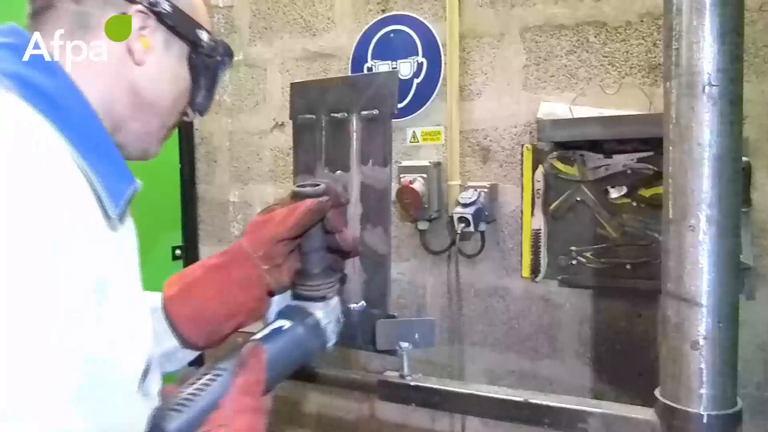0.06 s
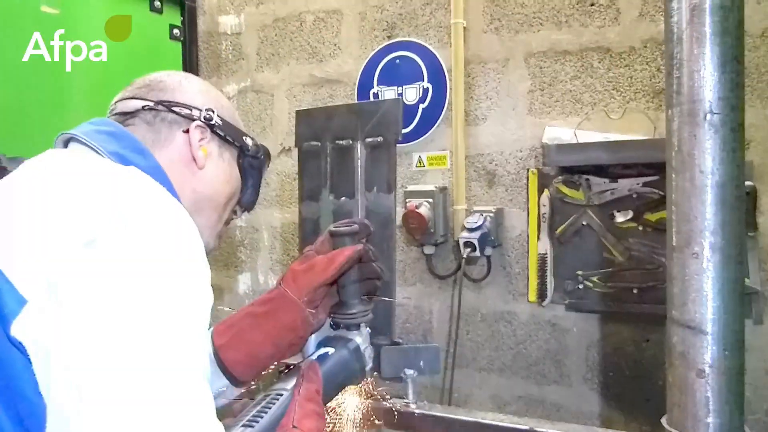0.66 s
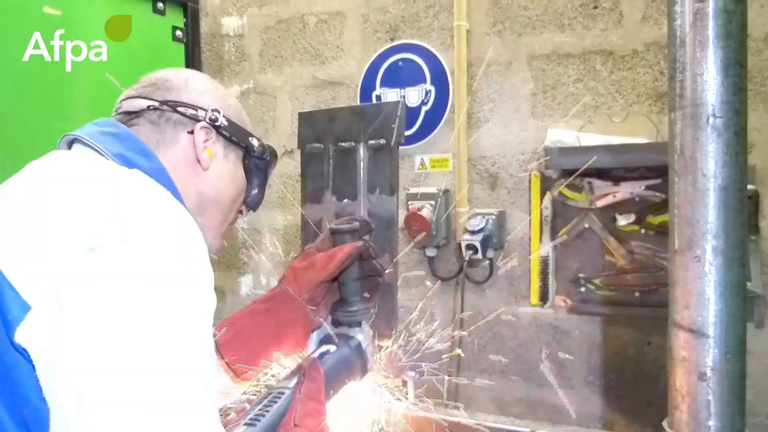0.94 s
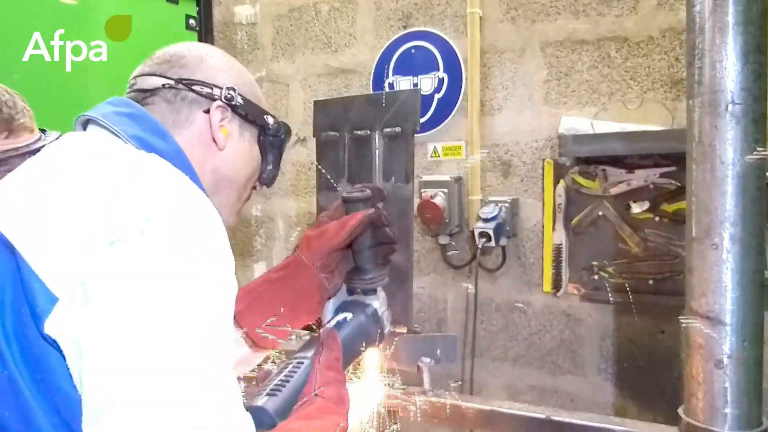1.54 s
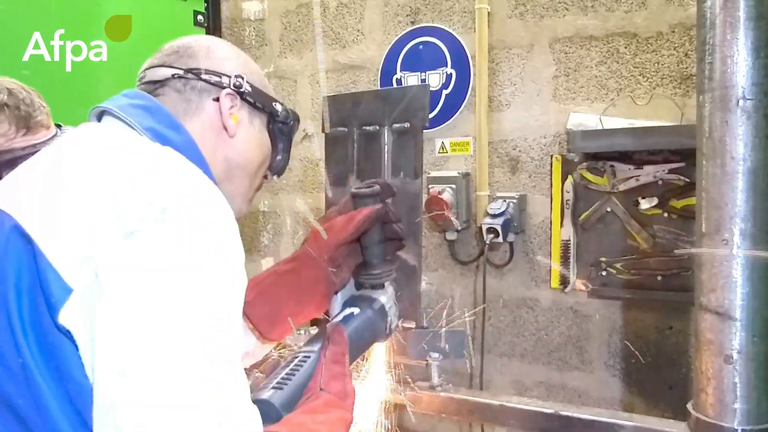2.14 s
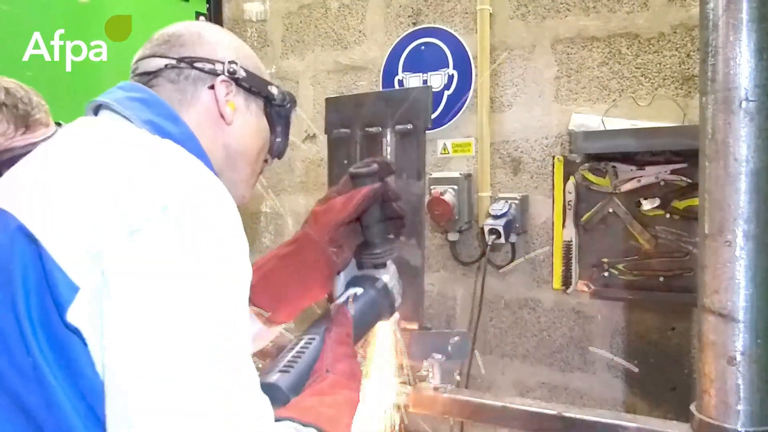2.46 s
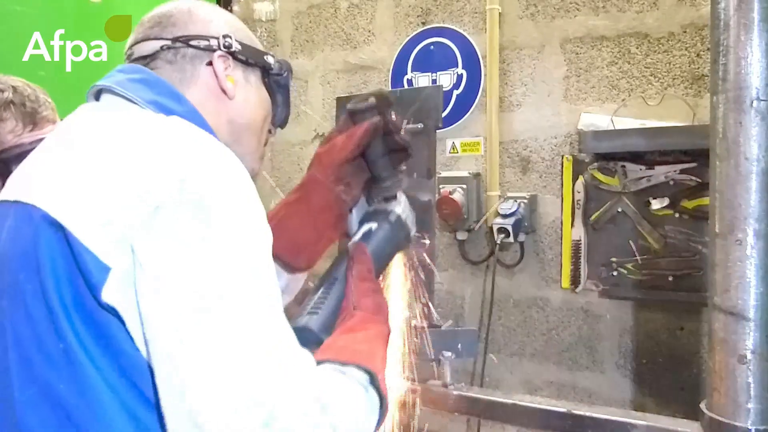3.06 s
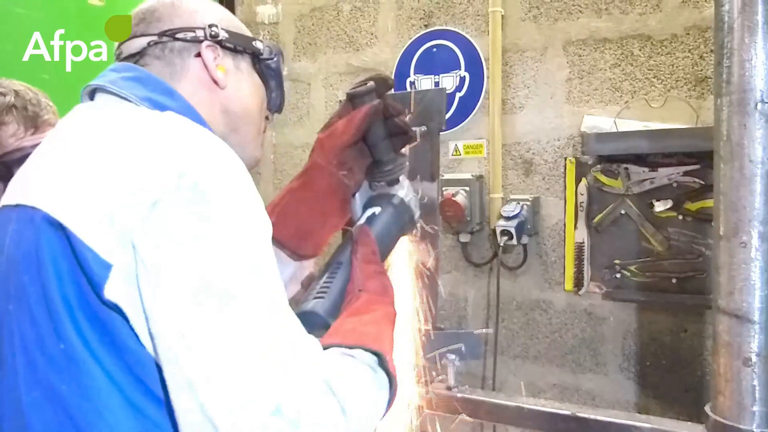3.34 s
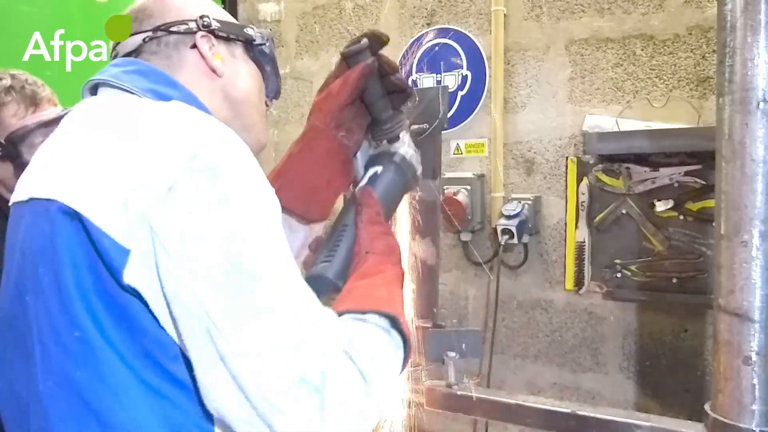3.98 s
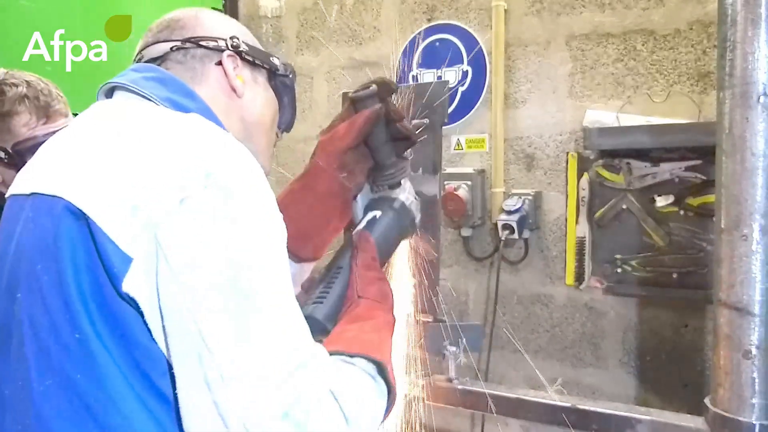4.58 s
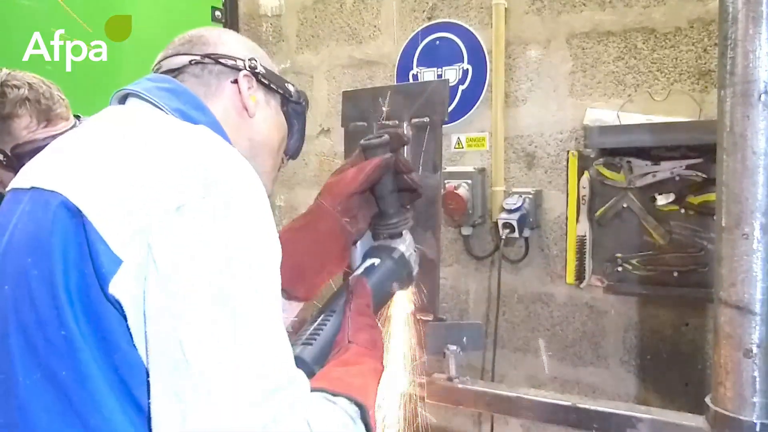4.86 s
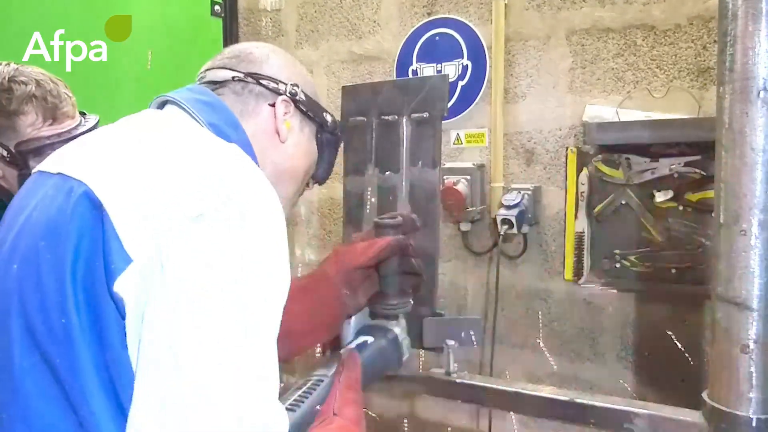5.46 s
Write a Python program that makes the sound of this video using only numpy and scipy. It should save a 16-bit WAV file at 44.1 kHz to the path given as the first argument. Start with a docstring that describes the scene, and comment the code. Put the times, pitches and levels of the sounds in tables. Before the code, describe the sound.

An angle grinder spins freely for an instant, then its disc hits a thick steel plate with a sharp crack and a rising zing. A loud, bright, gritty hiss follows as the motor slows under load. The disc chatters in its groove, with many short high squeals and a few rasping scrapes, easing slightly at the end. It is heard nearby, a little to the right, in a workshop.

```python
"""In a workshop, an angle grinder runs free, touches a thick steel plate and is drawn along it.
Its fan rushes over a faint room rumble. The disc lands with a crack and a zing, then its grains hiss.
Under load the motor slows and the disc chatters once per turn. The chatter is made of orders (whole
multiples of the motor speed), and one squeals when it meets a resonance, a pitch at which disc or plate
likes to ring. Now and then the disc scrapes in its groove."""
import sys
import numpy as np
from scipy import signal
from scipy.fft import rfft, irfft, next_fast_len
from scipy.io import wavfile
from scipy.ndimage import uniform_filter1d

SR = 44100
rng = np.random.default_rng(int(sys.argv[2]) if len(sys.argv) > 2 else 0)


def log_audio(samples):
    """Write samples as a 16-bit WAV file to the path given in sys.argv[1]."""
    # one column per channel
    frames = np.atleast_2d(samples).T
    # limit to full scale, then quantise
    limited = np.clip(frames, -1, 1)
    pcm = np.round(limited * 32767).astype(np.int16)
    wavfile.write(sys.argv[1], SR, pcm)


N = 247401
TIME = np.arange(N) / SR
FREQS_HZ = np.fft.rfftfreq(next_fast_len(N), 1 / SR) + 1

# wall reflections compared with the direct sound: pitch_hz, level_db
REFLECTIONS = [(60, -5), (150, -4), (330, -7), (500, -17), (800, -2), (1300, 0.5), (2400, -5), (4400, -1.5),
               (6400, -9.5), (8500, -20.5), (15000, -23.5)]
# balance between the ears: pitch_hz, left_minus_right_db
BALANCE = [(300, 0), (800, -0.5), (2400, -2.5), (4400, -3.8), (8000, -1), (15000, -0.5)]
# colour (how strong each pitch is) of the still room air: pitch_hz, level_db
AIR_COLOUR = [(12, -31), (20, -2.5), (139, -1.5), (176, 0), (274, -2.5), (300, 0), (390, -23), (660, -120)]
# soft handling bumps: start_s, level_db
BUMPS = [(.093, -48), (0.254, -38.5)]
# turns of the motor per second: time_s, speed_hz
MOTOR_SPEED = [(0.17, 564), (0.41, 565), (0.65, 536), (1.01, 454), (1.18, 418.0), (1.31, 420),
               (1.41, 413.7), (1.51, 406), (1.61, 400.4), (1.71, 400), (1.81, 397.3), (1.87, 394.7),
               (1.96, 389.2), (2.02, 384.7), (2.15, 380.6), (2.29, 389), (2.46, 381.3), (2.59, 384.3),
               (2.7, 381.2), (2.81, 385.8), (2.96, 377.6), (3.12, 374.5), (3.2, 384.3), (3.28, 382.6),
               (3.4, 378), (3.49, 373), (3.64, 380.3), (3.8, 380.8), (3.9, 384.2), (3.98, 382),
               (4.07, 374.4), (4.2, 381.2), (4.32, 389), (4.41, 375.7), (4.53, 372.6), (4.76, 374.2),
               (4.87, 372.6), (5.04, 378.8), (5.11, 377), (5.26, 379), (5.35, 373.7), (5.44, 363),
               (5.59, 409)]
# motor and fan noise: pitch_hz, level_db
FAN_COLOUR = [(30, -44), (200, -21), (290, -11), (420, -7.5), (620, -1.5), (950, -7), (1400, -5),
              (1900, -9.5), (4300, -6), (6500, -6.5), (9000, -14), (13000, -10.5), (16000, -11)]
# resonances of the motor housing: pitch_hz, width_hz, free_boost_db, loaded_boost_db
HOUSING_RINGS = [(419, 42, 9.1, 2.6), (481, 34, 15.5, 10.7), (563, 9.7, 4.9, 2.9), (771, 51, 13.5, 10.2)]
# the crack of disc on steel: pitch_hz, level_db
CRACK_COLOUR = [(120, -45), (350, -28), (900, -15), (1800, 6), (4500, 4), (6400, 7.5), (9000, 7.5),
                (16000, -1)]
# resonances of the struck disc: pitch_hz, width_hz, boost_db
CRACK_RINGS = [(4400, 250, 5), (5980, 200, 17.5), (6500, 180, 7)]
# loudness of the cut, following the pressure of the hand: time_s, level_db
HAND_PRESSURE = [(0.21, -24), (0.25, -20.5), (0.61, -19), (1.17, -22), (1.25, -19), (1.75, -22),
                 (1.91, -19), (2.07, -20.5), (2.97, -21), (3.01, -23.5), (3.53, -20), (4.25, -22.5),
                 (4.37, -21.5), (4.91, -21.5), (4.95, -23.5), (5.09, -22.5), (5.17, -25.5), (5.43, -22),
                 (5.49, -26.5), (5.59, -22)]
# the disc skimming the surface: pitch_hz, level_db
SKIM_COLOUR = [(500, -41), (1200, -26), (1700, -17.5), (2150, -6.5), (3500, -5.5), (4250, -0.5),
               (4800, -1.5), (6500, 4.5), (7700, 1), (9500, 1), (10800, -4.5), (12300, 7.5), (13200, 0),
               (14900, 8), (15900, 6)]
# the disc running in its groove: pitch_hz, level_db
GROOVE_COLOUR = [(500, -41.5), (1000, -34), (1500, -27), (2100, -10), (3500, -8.5), (4300, -1), (5300, -5),
                 (6450, 8), (7900, -7.5), (8900, 1), (11300, -1.5), (12400, 14), (15000, 15), (15900, 3.5)]
# resonances of disc and plate: pitch_hz, width_hz, skim_boost_db, groove_boost_db
CUT_RINGS = [(1684, 27, 5, 11), (2153, 27, 6.5, 2.5), (3064, 12, 16, 6), (3247, 63, 8.5, 10),
             (4240, 150, 6, 1), (3820, 40, -1, 3), (4520, 160, -9, 3), (4570, 56, 14, 6),
             (8600, 190, -3.5, 7)]
# the cut's low (plate), middle and high (grit) bands:
# offset_db, db_per_hz of extra motor speed, skid_loss_db, pressure_share, lift_loss_db
CUT_BANDS = [(-12, 0.0287, 0, 0.93, 0.5), (-6.5, 0.0228, 8, 0.81, 2), (-2.5, 0.0376, 0, 0.35, 7)]
BAND_EDGES_HZ = [5300, 11500]
# the chatter is sharper than the hiss: pitch_hz, boost_db
CHATTER_TILT = [(2200, -5.5), (3300, -4), (4200, -3), (4600, -5.5), (5500, -5), (7000, -4.5), (8700, -0.5),
                (9700, 2), (11200, 3.5), (13000, 1.5)]
# the disc judders hard in its groove: middle_s, length_s
JUDDERS = [(1.66, 0.68), (2.12, 0.14), (2.33, 0.12), (2.58, 0.13), (3.04, 0.17), (3.25, 0.21),
           (3.83, 0.069), (4.1, 0.35), (4.98, 0.076), (5.19, 0.21)]
# squeals: start_s, end_s, order, level_db, neighbour_share, left_minus_right_db
SQUEALS = [(0.82, 0.95, 6, -36, 0.1, -3), (0.95, 1.002, 7, -33.5, 0.1, -4), (1.037, 1.11, 9, -34, 0.2, -6),
           (1.064, 1.14, 7, -39.0, 0, 2), (1.184, 1.427, 11, -34.5, 0, -7), (1.192, 1.365, 7, -34.5, 0, -3),
           (1.243, 1.424, 21, -40, 0.5, -1), (1.4, 1.563, 7, -40, 0, 1.5), (1.53, 1.586, 22, -29, 0.1, 0),
           (1.541, 1.63, 8, -38.5, 0, 1), (1.564, 1.698, 9, -37.0, 0.1, -2), (1.571, 1.812, 7, -36, 0, -2),
           (1.575, 1.718, 33, -33, 0.3, -7), (1.613, 1.86, 11, -39.5, 0.1, -9),
           (1.62, 1.723, 10, -45, 0, -10), (1.85, 2.012, 3, -55, 0, -4), (1.98, 2.06, 16, -33, 0.3, -6),
           (2.05, 2.317, 8, -45.5, 0, 6), (2.057, 2.2, 23, -41, 0.1, 10), (2.099, 2.997, 3, -69.0, 0, -2),
           (2.15, 2.2, 32, -28, 0.2, 1), (2.335, 2.865, 5, -44.5, 0, -3), (2.37, 2.49, 38, -27.5, 0.3, -6),
           (2.45, 2.741, 8, -45, 0, 11), (2.473, 2.552, 17, -33, 0.5, -2), (2.715, 2.823, 10, -38, 0.1, -5),
           (2.744, 2.779, 23, -27.5, 0.1, 2), (2.899, 2.967, 8, -36, 0, -2),
           (2.985, 3.12, 16, -35.5, 0.2, 0), (2.991, 3.12, 23, -30.5, 0.2, -2),
           (3.004, 3.06, 33, -29, 0.5, 5), (3.07, 3.176, 13, -34, 0, 5), (3.15, 3.33, 3, -68.5, 0, -1),
           (3.202, 3.268, 23, -25, 0.1, -1), (3.286, 3.51, 10, -38, 0, -19), (3.432, 3.508, 13, -33, 0, 10),
           (3.484, 3.544, 20, -32.0, 0.1, -2), (3.514, 3.622, 10, -29.5, 0, -10),
           (3.536, 3.623, 17, -31, 0.5, -1), (3.543, 3.774, 23, -39, 0.1, -10),
           (3.718, 3.818, 9, -36, 0, -4), (3.78, 3.883, 38, -33, 0.6, -9), (3.903, 3.986, 9, -36, 0, -6),
           (3.9, 4.004, 10, -38.5, 0, -11), (3.943, 4.164, 23, -37, 0.1, -6),
           (4.022, 4.101, 20, -35, 0.1, -3), (4.064, 4.132, 17, -32.5, 0.9, -6),
           (4.097, 4.148, 37, -26, 0.3, -3), (4.358, 4.472, 23, -40, 0.2, -6),
           (4.38, 4.469, 10, -36, 0, -8), (4.539, 4.684, 23, -40, 0.3, -4), (4.698, 4.806, 13, -32.0, 0, 7),
           (4.779, 4.941, 3, -62, 0, 1), (4.888, 5.28, 29, -38, 0.1, -7), (4.959, 5.052, 33, -36, 0.3, 4),
           (5.059, 5.3, 23, -36.5, 0.1, 6.5), (5.068, 5.137, 25, -38, 0.7, -5),
           (5.06, 5.173, 17, -36, 1, -6), (5.119, 5.197, 35, -30, 0.2, -7), (5.19, 5.331, 10, -37.5, 0, -7),
           (5.203, 5.31, 16, -35, 0.1, -12), (5.193, 5.323, 12, -37.5, 0, -4), (5.214, 5.41, 8, -40, 0, -2),
           (5.222, 5.298, 33, -31, 0.35, 3), (5.233, 5.286, 35, -28, 0.3, -8),
           (5.326, 5.43, 18, -31, 0.15, -4), (5.38, 5.45, 19, -35, 0.1, -15)]
# the face of the disc scrapes the groove wall: start_s, end_s, level_db
SCRAPES = [(0.832, 0.877, -23), (1.88, 2.05, -38), (2.813, 2.9, -34), (3.831, 3.948, -32), (4, 4.063, -28),
           (4.321, 4.588, -26.5), (4.599, 4.717, -30.5), (5.367, 5.459, -34)]
# colour of a scrape: pitch_hz, level_db
SCRAPE_COLOUR = [(800, -45), (2500, -23), (4000, -2.5), (5400, -9), (7000, 5), (7900, -9), (9200, 1),
                 (15000, 0.5)]
# broad resonances of the scraped steel: pitch_hz, width_hz, boost_db
SCRAPE_RINGS = [(4150, 310, 13), (4430, 250, 7.2), (6250, 370, 7.7), (6660, 300, 6.7)]

TOUCH_S, CHATTER_FADE_S, LIFT_S = 0.1722, 5.26, 5.43   # disc lands, chatter starts to fade, disc lifts
SINK_START_S, SINK_END_S = 0.51, 3   # the disc sinks into its groove
LOADED_HZ, CUTOFF_HZ = 380, 15850   # usual motor speed in the groove; top of the treble


def from_db(db):
    """Turn decibels into a gain to multiply by."""
    return 10 ** (np.asarray(db) / 20)


def rms(x):
    """Average strength of a signal (root mean square)."""
    return np.sqrt(np.mean(x ** 2) + 1e-20)


def in_time(rows):
    """Join (time, value) points into one value per sample."""
    return np.interp(TIME, *np.transpose(rows))


def response(colour, rings=()):
    """Gain at each pitch: a broad colour with resonances on top."""
    hz, db = np.transpose(colour)
    boosts = sum(boost / (1 + (2 * (FREQS_HZ - centre) / width) ** 2) for centre, width, boost in rings)
    return from_db(np.interp(np.log(FREQS_HZ), np.log(hz), db) + boosts)


def filtered(x, gain):
    """Apply a gain at each pitch."""
    size = next_fast_len(N)
    return irfft(rfft(x, size) * gain, size)[..., :N]


def drift(rate_hz, size=N):
    """A smooth random wobble, about 1 in size, drawn every 40 samples."""
    pole = np.exp(-80 * np.pi * rate_hz / SR)
    slow = signal.lfilter([1], [1, -2 * pole, pole * pole], rng.standard_normal(N // 40 + 2002))[2000:]
    return np.interp(np.arange(size) / 40, np.arange(len(slow)), slow / rms(slow))


def fade(start_s, end_s, share=0.28):
    """Swell and die away, each over a share of the length; half strength at start and end."""
    inside_s = np.minimum(TIME - start_s, end_s - TIME)
    return np.clip(inside_s / (share * (end_s - start_s)) + .5, 0, 1)


def in_room(pair, gain, walls_db=0):
    """The first signal arrives directly, the second as reflections that differ between the ears."""
    direct = filtered(pair[0], gain)
    reflected = filtered(pair[1], gain * response(REFLECTIONS)) * from_db(walls_db)
    return np.array([direct + reflected, direct - reflected])


def background(air_db=-78, bump_hz=125, bump_decay_s=0.02):
    """Faint room rumble and dull handling bumps."""
    air = in_room(rng.standard_normal((2, N)), response(AIR_COLOUR))
    out = air / rms(air) * from_db(air_db)
    for start_s, db in BUMPS:
        age = np.maximum(TIME - start_s, 0)
        out += from_db(db - 60 * age / bump_decay_s) * np.sin(2 * np.pi * bump_hz * age)
    return out


def fan(speed, free_db=-40, loaded_db=-71, db_per_hz=0.06):
    """The fan's rush is turned down sharply when the loud cut begins, then sinks further in step with the motor
    speed."""
    def rush(rings, walls_db):
        air = in_room(rng.standard_normal((2, N)), response(FAN_COLOUR, rings), walls_db)
        hollow = filtered(air.mean(0), (FREQS_HZ > 300) & (FREQS_HZ < 900))
        return air / rms(hollow)   # the hollow-sounding band sets the level
    free = rush([(hz, width, boost) for hz, width, boost, _ in HOUSING_RINGS], walls_db=-7)
    loaded = rush([(hz, width, boost) for hz, width, _, boost in HOUSING_RINGS], walls_db=0)
    loaded *= from_db(loaded_db + db_per_hz * (speed - LOADED_HZ))
    turned_down = np.clip((TIME - TOUCH_S) / 0.018, 0, 1)
    return (1 - turned_down) * from_db(free_db) * free + turned_down * loaded


def crack(level_db=-12, decay_s=0.1):
    """The disc strikes the steel and rings briefly."""
    age = np.maximum(TIME - TOUCH_S, 0)
    ring = in_room(rng.standard_normal((2, N)), response(CRACK_COLOUR, CRACK_RINGS))
    return ring / rms(ring) * from_db(level_db - 60 * age / decay_s) * np.minimum(age / 0.0011, 1)


def skid(start_hz=7210, rise_hz_per_s=71000, top_hz=15100, level_db=-17.5, swell_s=0.028, hold_s=0.048):
    """The disc skids with a zing: a band of noise that glides up, swells, holds and dies."""
    age = np.maximum(TIME - TOUCH_S, 0)
    centre_hz = np.minimum(start_hz + rise_hz_per_s * age, top_hz)
    dying_s = np.maximum(age - swell_s - hold_s, 0)
    swell = np.minimum(age / swell_s, 1) * from_db(level_db - 220 * dying_s)
    noise = signal.sosfilt(signal.butter(2, 1800, fs=SR, output="sos"), rng.standard_normal((2, N)))
    zing = ((noise[0] + 1j * noise[1]) * np.exp(2j * np.pi * np.cumsum(centre_hz) / SR)).real
    treble_only = 1 / (1 + (6800 / FREQS_HZ) ** 8)
    zing = filtered(zing * from_db(1.5 * drift(150)), treble_only)
    return swell * zing / rms(zing)


def grit(ticks_per_s, spread_db, tick_share):
    """The disc's grains strike at random: a smooth hiss of many, and single larger ticks."""
    sizes = from_db(spread_db * np.minimum(rng.exponential(1, N), 4)) * rng.choice([-1, 1], N)
    ticks = sizes * (rng.random(N) < ticks_per_s / SR)
    hiss = np.sqrt(1 - tick_share) * rng.standard_normal((2, N))
    return hiss + np.sqrt(tick_share) * ticks / rms(ticks) * [[1], [0]]   # ticks: direct path only


def chatter(speed, angle, phases, wear_hz=23.4, flare_db=3.5, flare_hz=5, link=0.52):
    """The bite repeats each motor turn as its shape wears; orders flare up with their neighbours."""
    out, wave = np.zeros((2, N)), np.ones(N, complex)
    turn = np.exp(1j * angle)
    surge = drift(flare_hz)
    for order in range(1, int(CUTOFF_HZ / speed.min()) + 1):
        wave = wave * turn
        surge = link * surge + np.sqrt(1 - link ** 2) * drift(flare_hz)
        flare = from_db(flare_db * np.tanh(surge)) * (order * speed < CUTOFF_HZ)
        steady = 1.4 / (1 + (order * LOADED_HZ / 12000) ** 4)   # the finest detail wears fastest
        for path, phase in zip(out, phases[order]):
            strength = steady * np.exp(1j * phase) + drift(wear_hz) + 1j * drift(wear_hz)
            path += flare * (strength * wave).real
    return out / rms(out) * np.sqrt(2 * CUTOFF_HZ / SR)   # same power per Hz as white noise


def chatter_over_hiss(speed, db_per_hz=0.26, judder_db=3, fade_db_per_s=48):
    """Chatter grows as the motor slows, swells in each judder and fades shortly before the disc lifts."""
    judder = sum(np.cos(np.pi * np.clip((TIME - middle) / length, -.5, .5)) for middle, length in JUDDERS)
    bite_db = 0.54 - db_per_hz * (speed - LOADED_HZ) + 1.2 * drift(0.93)
    return from_db(bite_db + judder_db * judder - fade_db_per_s * np.maximum(TIME - CHATTER_FADE_S, 0))


def flexing_disc(drive, speed, tilt=1, pitch_swing=0.0105, speed_range_hz=27):
    """Disc and plate ring; pressing harder slows the motor, flexes the disc and lowers the ringing."""
    relaxed = np.clip(.5 + (speed - LOADED_HZ) / speed_range_hz, 0, 1)
    out = 0
    for shift, share in ((1 - pitch_swing, 1 - relaxed), (1 + pitch_swing, relaxed)):
        rings = [(hz * shift, width, boost) for hz, width, _, boost in CUT_RINGS]
        out += in_room(drive * share, tilt * response(GROOVE_COLOUR, rings))
    return out


def give_way(squeal, level_db, smooth_s=0.034):
    """A gain that turns a band of the cut down while the disc squeals in it."""
    power = np.maximum(uniform_filter1d(squeal ** 2, int(smooth_s * SR)), 0)
    return 1 / np.sqrt(1 + 0.24 * power / from_db(level_db) ** 2)


def cut(speed, angle, phases, squeal, usual_db=-21.5, grip_s=0.14, disc_per_motor_turn=0.3):
    """Hiss and chatter shake disc and plate, pulsing as motor and disc turn."""
    buzz_gain = chatter_over_hiss(speed)
    motor_throb = 0.12 * np.minimum(buzz_gain, 1) * np.cos(angle)
    disc_wobble = 0.022 * np.cos(disc_per_motor_turn * angle)
    pulsing = (1 + motor_throb + disc_wobble) * from_db(0.71 * drift(19.4))
    hiss = pulsing * grit(ticks_per_s=2500, spread_db=2.5, tick_share=0.18)
    buzz = pulsing * chatter(speed, angle, phases)
    skidding = np.clip(1 - ((TIME - TOUCH_S) / grip_s) ** 2, 0, 1)
    depth = np.interp(TIME, [SINK_START_S, SINK_END_S], [0, 1])
    lifted = np.clip((TIME - LIFT_S) / 0.079, 0, 1)
    pressure_db = in_time(HAND_PRESSURE) - usual_db
    skim_colour = response(SKIM_COLOUR, [(hz, width, boost) for hz, width, boost, _ in CUT_RINGS])
    ringing_hiss = flexing_disc(hiss, speed)
    ringing_buzz = flexing_disc(buzz, speed, response(CHATTER_TILT))
    out = 0
    for k, (offset_db, db_per_hz, skid_loss_db, pressure_share, lift_loss_db) in enumerate(CUT_BANDS):
        band = np.digitize(FREQS_HZ, BAND_EDGES_HZ) == k
        level_db = usual_db + offset_db + pressure_share * pressure_db + db_per_hz * (speed - LOADED_HZ)
        level_db += 0.89 * depth * drift(14) - skid_loss_db * skidding - lift_loss_db * lifted
        skimming = in_room(hiss, skim_colour * band, walls_db=-2)
        cutting, buzzing = filtered(ringing_hiss, band), filtered(ringing_buzz, band)
        hiss_rms = rms(cutting.mean(0))
        sound = (1 - depth) * skimming / rms(skimming.mean(0))
        sound += (depth * cutting + buzz_gain * buzzing) / hiss_rms
        sound *= give_way(filtered(squeal, band), level_db)
        # chatter takes most of its power from the hiss
        sound /= np.sqrt(1 + 0.92 * (buzz_gain * rms(buzzing.mean(0)) / hiss_rms) ** 2)
        out += sound * from_db(level_db)
    return out * np.clip((TIME - TOUCH_S) / 0.0023, 0, 1)


def squeals(angle, phases, waver_db=0.5, waver_rad=0.013, roughness=0.27):
    """One order of the chatter locks onto a resonance, swells, pulls its neighbours along and lets go."""
    out, walls = np.zeros((2, N)), response(REFLECTIONS)
    ears = np.array([[1], [-1]])
    for start_s, end_s, order, db, neighbour_share, pan_db in SQUEALS:
        swell = fade(start_s, end_s)
        on = np.flatnonzero(swell)
        pan = from_db(ears * pan_db / 2)
        for k, share in ((order - 1, neighbour_share), (order, 0.93), (order + 1, neighbour_share)):
            # the walls carry each pitch unevenly to the two ears
            lag = ears * np.arctan(np.interp(k * LOADED_HZ, FREQS_HZ, walls)) * rng.choice([-1, 1])
            strength = share * np.sqrt(2) * swell[on] * from_db(db - 0.1 + waver_db * drift(5, len(on)))
            strength *= 1 + roughness * drift(55, len(on))
            phase = k * (angle[on] + waver_rad * drift(25, len(on)))   # high orders waver most
            out[:, on] += pan / pan.mean() * strength * np.cos(phase + phases[k, 0] + lag)
    return out


def scrapes(angle, rough_db=2, rough_hz=70, throb=0.17):
    """Coarse grains drag over the steel and make it ring, unevenly and in time with the motor."""
    grains = grit(ticks_per_s=970, spread_db=5, tick_share=0.49)
    rasp = in_room(grains, response(SCRAPE_COLOUR, SCRAPE_RINGS))
    rasp *= from_db(rough_db * drift(rough_hz)) * (1 + throb * np.cos(angle))
    swell = sum(from_db(db) * fade(start_s, end_s) for start_s, end_s, db in SCRAPES)
    return swell * rasp / rms(rasp)


def scene():
    """One turning motor drives chatter and squeals; the grinder is heard a little to the right."""
    speed = in_time(MOTOR_SPEED)
    angle = 2 * np.pi * np.cumsum(speed) / SR
    phases = rng.uniform(0, 2 * np.pi, size=(64, 2, 1))   # one per order, direct and reflected
    squealing = squeals(angle, phases)
    grinding = cut(speed, angle, phases, squealing.mean(0)) + scrapes(angle)
    sound = grinding + crack() + skid() + fan(speed) + background()
    left_gain = np.sqrt(response(BALANCE))
    return filtered(sound, np.array([left_gain, 1 / left_gain])) + squealing


def record(dry):
    """The highest treble is cut off steeply."""
    return signal.sosfilt(signal.ellip(12, .1, 90, CUTOFF_HZ, fs=SR, output="sos"), dry)


dry = scene()
out = record(dry)
log_audio(out)
```